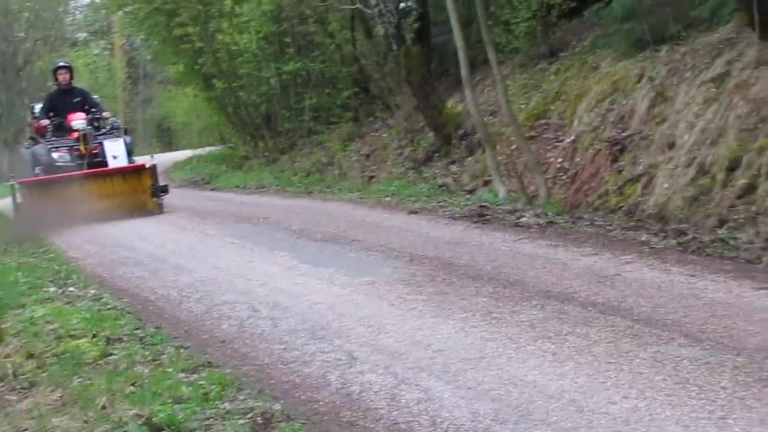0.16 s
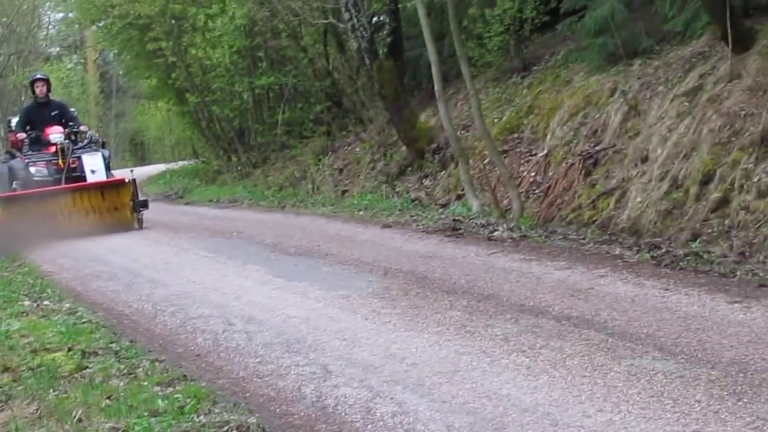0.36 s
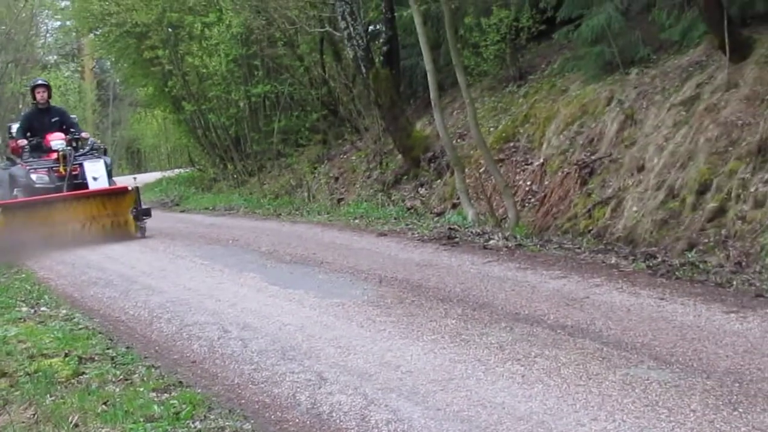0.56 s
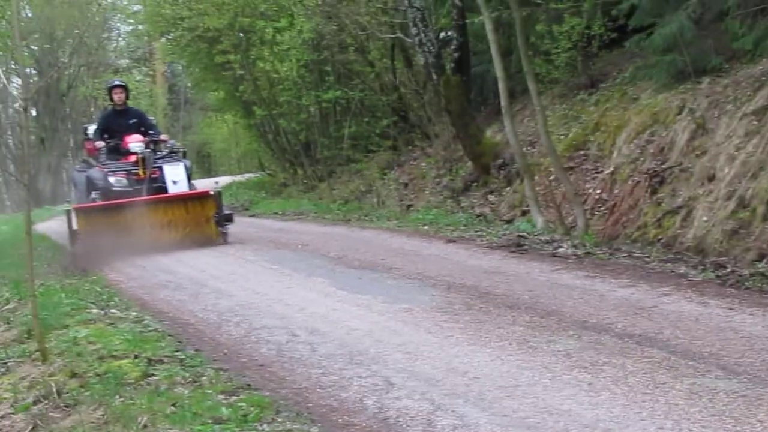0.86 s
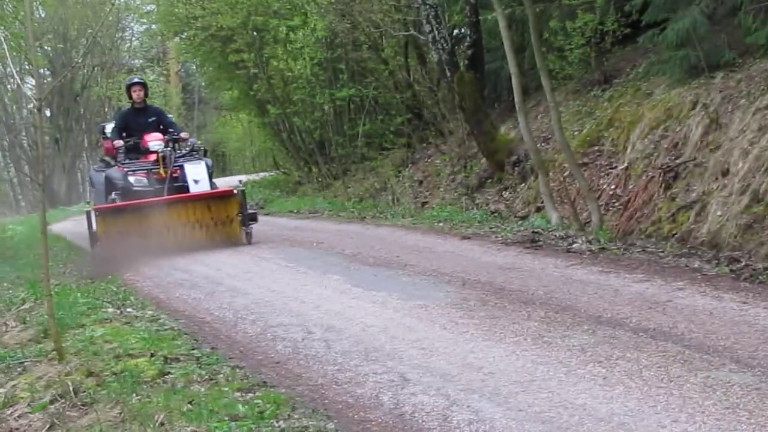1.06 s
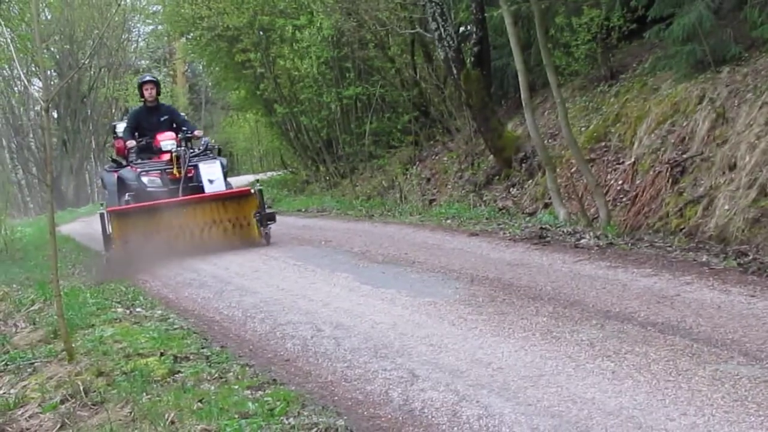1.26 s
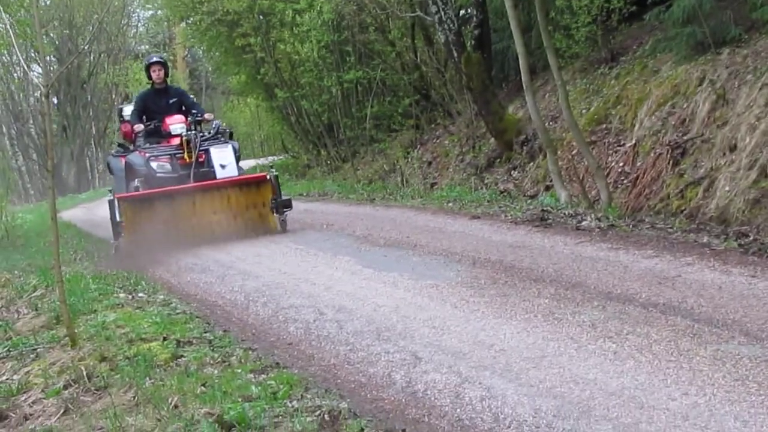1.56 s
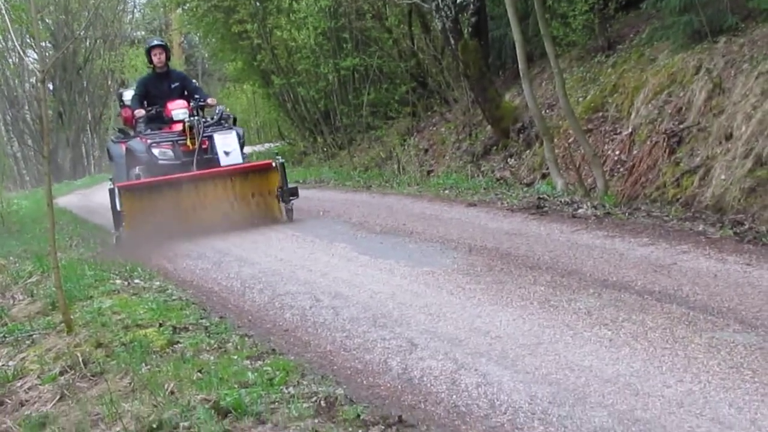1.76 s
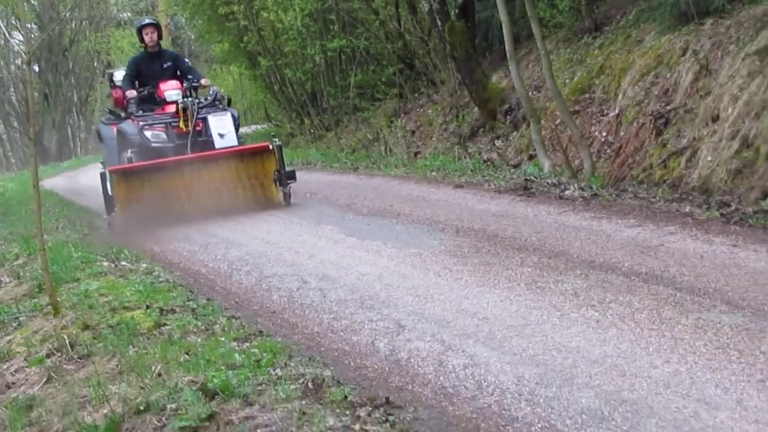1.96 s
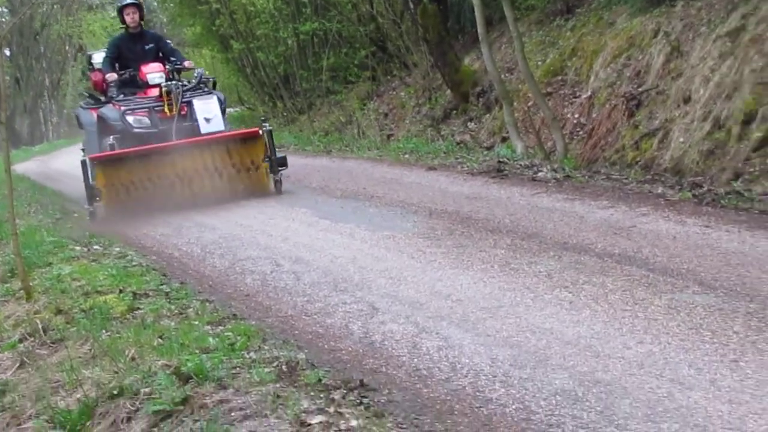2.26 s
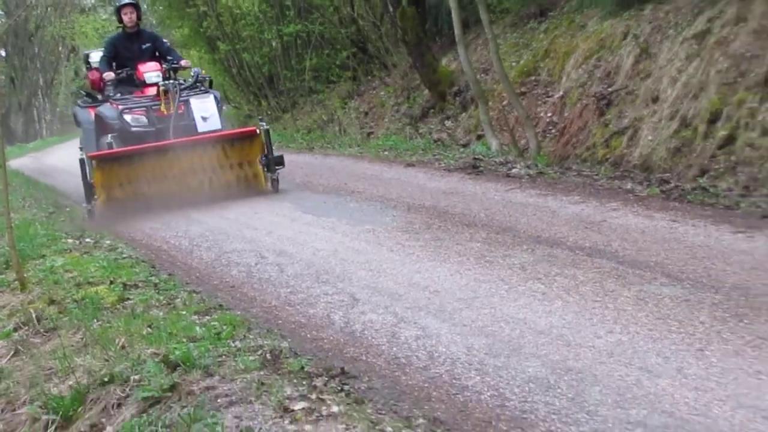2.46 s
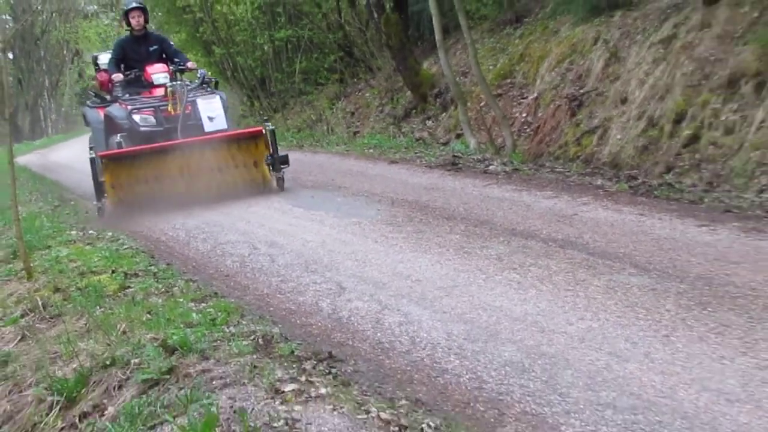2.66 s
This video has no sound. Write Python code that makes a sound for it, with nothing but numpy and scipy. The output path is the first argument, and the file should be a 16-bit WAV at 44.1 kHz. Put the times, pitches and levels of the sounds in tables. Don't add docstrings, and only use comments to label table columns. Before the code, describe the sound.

Constant bright scrubbing of stiff bristles over stones on an open lane, swelling slightly and unevenly, above a steady fluttering engine drone, faint metallic rattle, slow engine thuds and tyre rumble, heard by a small stereo camera microphone.

```python
import sys
import numpy as np
from scipy import signal
from scipy.fft import rfft, irfft, next_fast_len
from scipy.io import wavfile
from scipy.ndimage import uniform_filter1d, map_coordinates

SR = 44100
rng = np.random.default_rng(int(sys.argv[2]) if len(sys.argv) > 2 else 0)


def int16_out(signal):
    q = np.round(np.clip(np.atleast_2d(signal).T, -1, 1) * 32767)
    wavfile.write(sys.argv[1], SR, q.astype(np.int16))


def nominal_scale(level):
    x = np.asarray(level, float) / 20
    return 10 ** x


N = 124362
LEAD_IN = SR // 8


def unit(x):
    return x / np.sqrt(np.mean(x ** 2) + 1e-20)


def along(points, hz):
    f, v = np.transpose(points)
    return np.interp(np.log(hz + 1), np.log(f + 1), v)


def curves(rows):
    s, *cols = np.transpose(rows)
    return [np.interp(np.arange(N) / SR, s, c) for c in cols]


def wobble(rate):
    knots = rng.standard_normal(int(N * rate / SR) + 4)
    return map_coordinates(knots, [np.arange(N) * rate / SR])


def filtered(x, response):
    m = 2 * next_fast_len(N // 2 + SR // 4)
    hz = np.fft.rfftfreq(m, 1 / SR)
    return irfft(rfft(x, m) * response(hz), m)[..., :x.shape[-1]]


def causal(db):
    cepstrum = irfft(np.log(nominal_scale(db) + 1e-4))
    half = len(cepstrum) // 2
    cepstrum[1:half] *= 2
    cepstrum[half + 1:] = 0
    return np.exp(rfft(cepstrum))


def patchy(pair, db):
    z = signal.stft(pair, nperseg=512)[2]
    field = rng.standard_normal(z.shape[1:])
    field = uniform_filter1d(field, size=8, axis=0)
    field = uniform_filter1d(field, size=10, axis=1)
    return signal.istft(z * nominal_scale(db * unit(field)), nperseg=512)[1][:, :N]


# frequency in Hz, left-right likeness from 0 to 1.
PORT_LIKENESS = [(250, 0.99), (700, 0.96), (1750, 0.98), (2300, 0.86), (3400, 0.59), (4750, 0.41),
                 (5800, 0.82), (12500, 0.83), (15300, .6)]


def rush(pair, spectrum):
    def mid_and_side(hz):
        turn = np.arccos(np.clip(along(PORT_LIKENESS, hz), 0, 1)) / 2
        return nominal_scale(along(spectrum, hz)) * np.array([np.cos(turn), np.sin(turn)])

    mid, side = filtered(pair, mid_and_side)
    return unit(np.array([mid + side, mid - side]))


GRAINS_PER_S, GRAIN_SPREAD_DB, GRAIN_SHARE = 9000, 1.7, 0.3


def gravel():
    hit = rng.random((2, N)) < GRAINS_PER_S / SR
    size = nominal_scale(GRAIN_SPREAD_DB * rng.exponential(size=(2, N)))
    clicks = hit * rng.choice([-1, 1], (2, N)) * size
    bed = rng.standard_normal((2, N))
    return np.sqrt(GRAIN_SHARE) * unit(clicks) + np.sqrt(1 - GRAIN_SHARE) * bed


# time in seconds, level in dB, left over right in dB (only its
SCRUB = [(0, -18, -1), (.2, -18, -1.3), (.45, -18, -1.5), (.72, -16.8, -1.5), (.85, -17.1, -1.7),
         (1.05, -17, -1.8), (1.22, -15.5, -2), (1.34, -17.3, -2), (1.43, -15.8, -2), (1.63, -18, -2),
         (1.74, -17, -2), (1.84, -15.7, -2), (2.03, -16, -2), (2.15, -17, -2), (2.45, -17.3, -2),
         (2.58, -16.6, -2), (2.68, -17.6, -2), (2.82, -16.8, -2)]
# frequency in Hz, density in dB per Hz.
BRISTLES = [(2290, -16), (3900, -17), (5450, -8), (6760, -7), (8080, -0.5), (8970, 0), (11700, -4),
            (13800, -11.5), (15500, -22)]
# frequency in Hz, density in dB per Hz.
GRIT = [(600, -30), (880, -9.5), (1280, -2), (1500, -5), (1800, -1.5), (2250, -3.5), (2800, 0.5),
        (3650, -2), (3950, -7.5), (5500, -22)]
HISS_TRIM_DB, GRIT_DB = -0.03, -32.5
GRIT_FOLLOWS, GRIT_FADE_DB_PER_S = 0.36, -0.8


def brush():
    level_db, pan_db = curves(SCRUB)
    t = np.arange(N) / SR
    shared_db = 0.16 * wobble(11.3) + 0.3 * wobble(30)

    hiss = rush(patchy(gravel(), db=0.29), BRISTLES)
    hiss = nominal_scale(HISS_TRIM_DB + level_db + shared_db) * hiss
    pan = nominal_scale(np.outer([0.5, -0.5], pan_db - pan_db.mean()))

    swing_db = GRIT_FOLLOWS * (level_db - level_db.mean() + shared_db)
    swing_db = swing_db + GRIT_FADE_DB_PER_S * t + 0.6 * wobble(7.54)
    grit = nominal_scale(GRIT_DB + swing_db) * rush(patchy(gravel(), db=0.3), GRIT)
    return hiss * pan + grit


def strikes(cycle, at, jitter_s, scatter_db):
    early = cycle[0] - (cycle[1] - cycle[0]) * np.arange(LEAD_IN, 0, -1)
    count = np.arange(int(early[0]), int(cycle[-1]) + 1)
    draw = rng.standard_normal((len(count), 2))
    sample = np.interp(count + at, np.r_[early, cycle], np.arange(N + LEAD_IN), right=-SR)
    sample = sample + jitter_s * SR * draw[:, 0]
    ok = (sample >= 0) & (sample < N + LEAD_IN)
    return np.bincount(sample[ok].astype(int), nominal_scale(scatter_db * draw[ok, 1]), N + LEAD_IN)


def echoes(table):
    return lambda hz: 1 + sum(nominal_scale(db) * np.exp(-2j * np.pi * hz * s) for s, db in table)


# multiple of the firing rate, gain in dB.
EXHAUST = [(1, -16), (2, -10), (3, -7), (4, -15), (5, 1.5), (6, -2), (7, -14.5), (8, -9), (9, -4.5),
           (10, -13), (11, -18), (12, -7.5), (13, -13), (14, -16.5), (15, -14), (16, -9.5), (17, -10),
           (18, -13), (19, -11), (20, -12.5), (21, -22), (22, -16), (23, -29), (24, -21)]
# delay in seconds, level in dB.
PIPE_ECHO = [(0.0103, -2), (.0215, -6)]


def muffler(rate_hz):
    k, db = np.transpose(EXHAUST)
    pipe = echoes(PIPE_ECHO)
    box_db = np.r_[-60, db - 20 * np.log10(abs(pipe(k * rate_hz))), -60]
    multiple = np.r_[0, k, k[-1] + 4]
    return lambda hz: pipe(hz) * causal(np.interp(hz / rate_hz, multiple, box_db))


# frequency in Hz, width in Hz, level in dB.
COVER = [(998, 49, -3.5), (1156, 19, 3), (1250, 40, -1.5), (1348, 40, 1), (1420, 22, -7), (1790, 160, -4)]


def tin(hz):
    total = 0
    for i, (centre, width, db) in enumerate(COVER):
        damping = 1j * hz * width
        total = total + (-1) ** i * nominal_scale(db) * damping / (centre ** 2 - hz ** 2 + damping)
    return total


# time in seconds, firings per second.
SHAFT = [
    (0, 29.69),
    (.8, 29.64),
    (1.1, 29.75),
    (2.82, 29.79),
]
# time in seconds, level in dB.
LOAD = [
    (0, -0.5),
    (.45, -0.5),
    (.85, 0),
    (1.3, -0.5),
    (1.8, -4),
    (2.3, -4),
    (2.82, -4.5),
]
# share of a cycle, level in dB.
TAPS = [
    (0, -2),
    (.333, -10),
    (.667, -8),
]
# frequency in Hz, density in dB per Hz.
PUFF = [(200, -29), (320, 0), (380, -6), (600, -6), (800, -12.5), (1200, -7.5), (1600, -27), (3000, -120)]
FIRST_SHARE = 0.96
EXHAUST_DB, PUFF_DB, PUFF_DEPTH_DB, COVER_DB = -29, -44.5, 2.5, -43


def brush_engine():
    rate, = curves(SHAFT)
    load_db, = curves(LOAD)
    cycle = np.cumsum(rate) / SR

    firings = strikes(cycle, FIRST_SHARE, jitter_s=0.00008, scatter_db=1.24)
    exhaust = unit(filtered(firings, muffler(rate.mean()))[LEAD_IN:])

    taps = sum(nominal_scale(db) * strikes(cycle, (FIRST_SHARE + share) % 1, jitter_s=0.00003, scatter_db=1.5)
               for share, db in TAPS)
    rattle = nominal_scale(COVER_DB + 0.66 * wobble(2.5)) * unit(filtered(taps, tin)[LEAD_IN:])

    gate = nominal_scale(PUFF_DEPTH_DB * np.cos(2 * np.pi * (cycle - FIRST_SHARE - 0.05)))
    puff = unit(gate * rush(rng.standard_normal((2, N)), PUFF))
    return nominal_scale(load_db) * (nominal_scale(EXHAUST_DB) * exhaust + nominal_scale(PUFF_DB) * puff) + rattle


# time in seconds, level in dB.
VEHICLE = [
    (0, -32),
    (.35, -32),
    (.75, -32),
    (1.2, -35),
    (1.7, -34.5),
    (2.2, -35),
    (2.82, -35.5),
]
# time in seconds, firings per second.
DRIVE = [
    (0, 18.3),
    (.5, 18.2),
    (.9, 18.5),
    (1.3, 18.75),
    (1.9, 19.4),
    (2.4, 20.35),
    (2.82, 20.55),
]
# frequency in Hz, gain in dB.
SILENCER = [(15, -38), (40, -10.5), (85, -6.5), (110, 1), (140, -0.5), (190, -10), (330, -11.5),
            (600, -58.5)]
# delay in seconds, level in dB.
TAILPIPE_ECHO = [(.017, -3), (.031, -8.5)]
# frequency in Hz, density in dB per Hz.
RUMBLE = [(12, -44), (20, -5), (135, 3), (167, -1.5), (217, -10), (260, -5), (340, -15), (570, -120)]
TYRES_DB = -5


def vehicle():
    level_db, = curves(VEHICLE)
    rate, = curves(DRIVE)
    tailpipe = echoes(TAILPIPE_ECHO)
    firings = strikes(np.cumsum(rate) / SR, 0.3012, jitter_s=0.00041, scatter_db=1.45)
    thuds = unit(filtered(firings, lambda hz: tailpipe(hz) * causal(along(SILENCER, hz)))[LEAD_IN:])
    tyres = unit(filtered(rng.standard_normal(N), lambda hz: nominal_scale(along(RUMBLE, hz))))
    return nominal_scale(level_db) * (thuds + nominal_scale(TYRES_DB) * tyres)


def scene():
    return brush() + brush_engine() + vehicle()


# frequency in Hz, left over right in dB.
PORTS_DB = [(1500, 0), (2240, -2.8), (3500, 0), (4800, 7), (5900, .3), (7900, -2.5), (10500, 2.3),
            (12600, -3.3), (15300, 0)]
# frequency in Hz, radians by which left leads.
PORTS_LEAD = [(1800, 0), (2750, .5), (3400, .37), (4350, 1.2), (5300, -.5), (6100, 0), (7400, 0),
              (8700, .62), (11200, .1), (14700, 1.25)]
LOW_CUT_HZ, TOP_HZ = 16, 15720


def microphone(hz):
    left = nominal_scale(along(PORTS_DB, hz) / 2) * np.exp(0.5j * along(PORTS_LEAD, hz))
    band = (hz < TOP_HZ) * hz ** 2 / (hz ** 2 + LOW_CUT_HZ ** 2)
    return band * np.array([left, 1 / left])


def low_pass(x):
    return signal.sosfilt(signal.butter(12, 15690, fs=SR, output="sos"), x)


def record(dry):
    mix = filtered(dry, microphone)
    return low_pass(mix)


dry = scene()
out = record(dry)
int16_out(out)
```